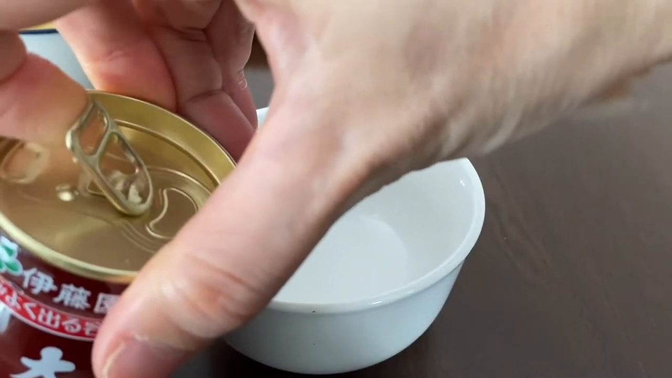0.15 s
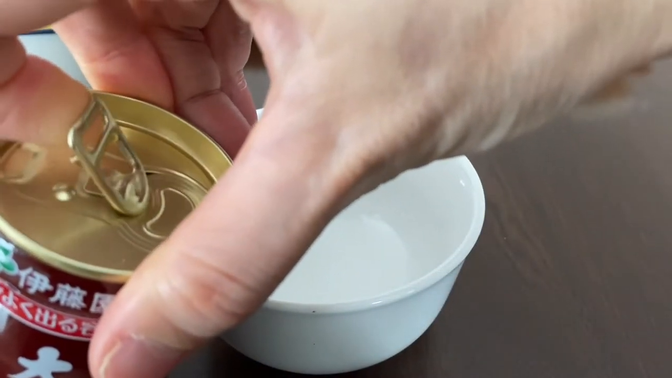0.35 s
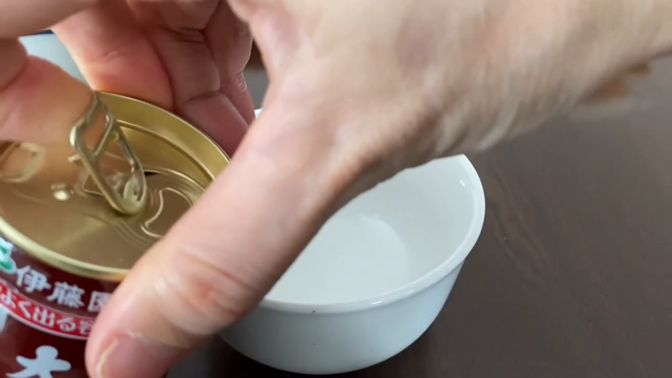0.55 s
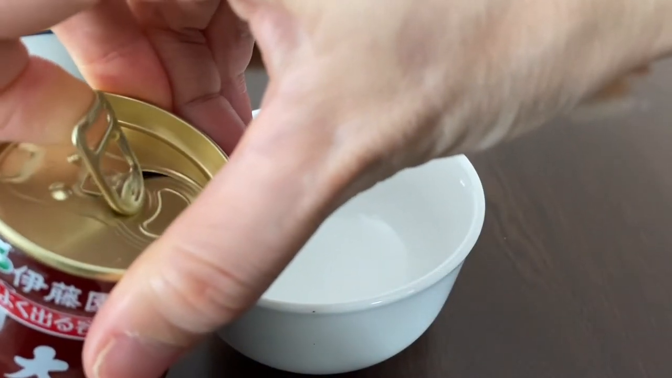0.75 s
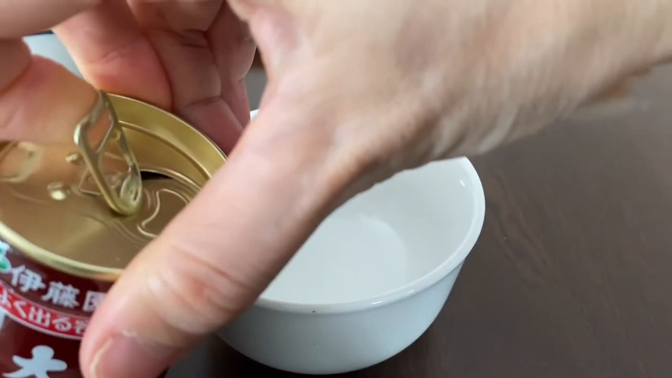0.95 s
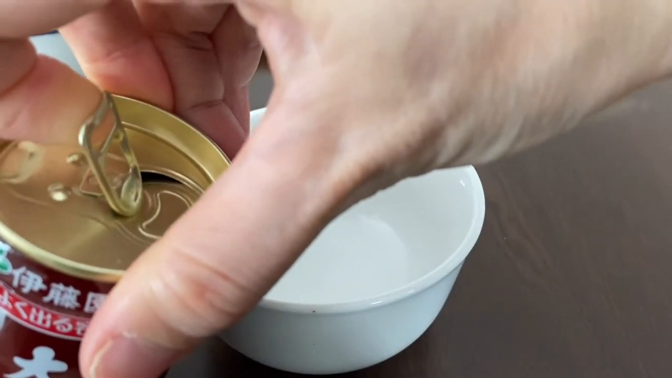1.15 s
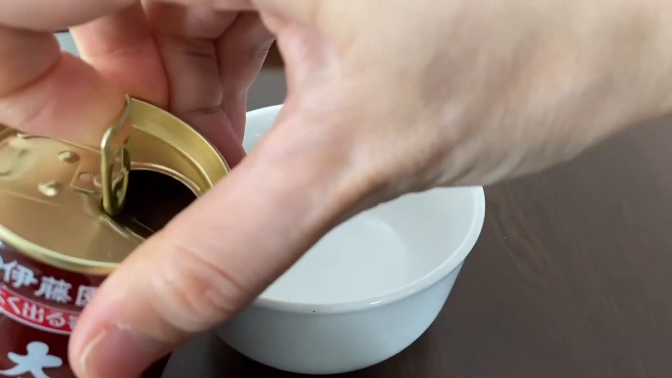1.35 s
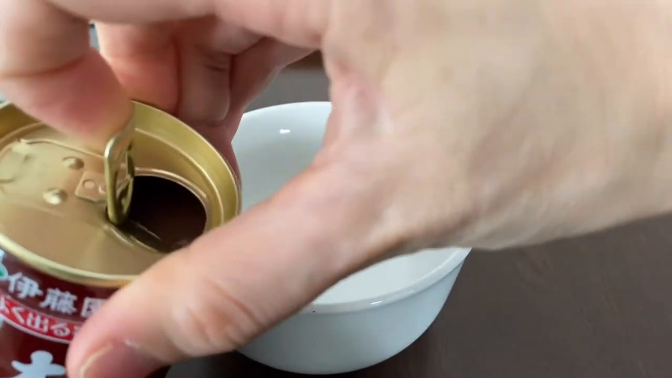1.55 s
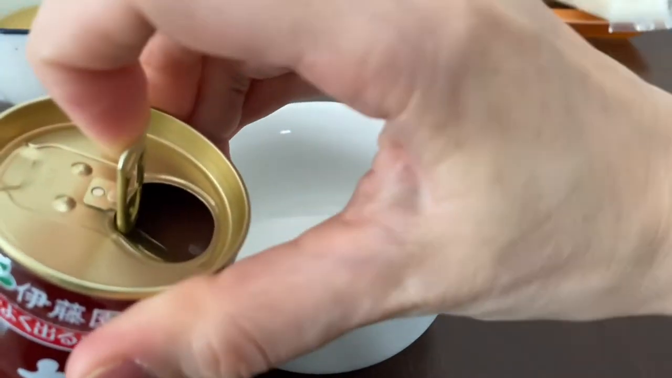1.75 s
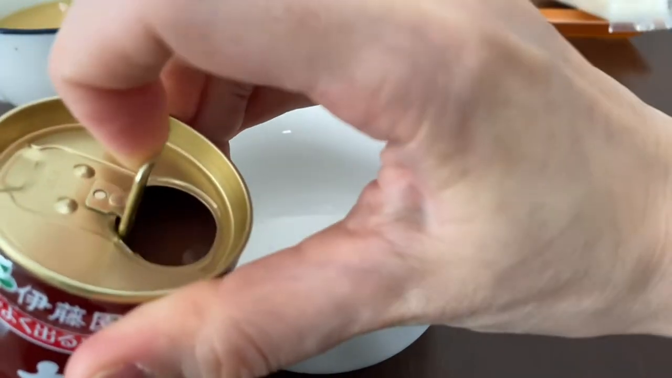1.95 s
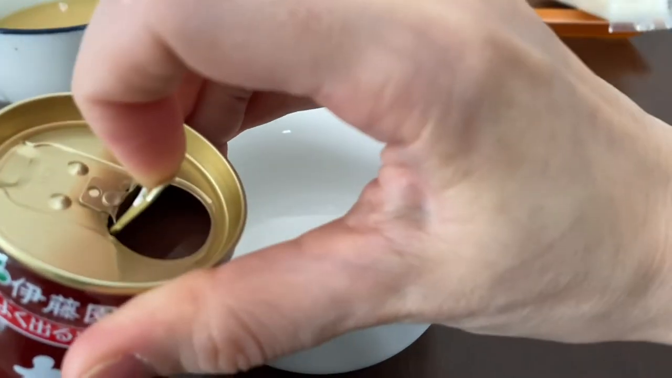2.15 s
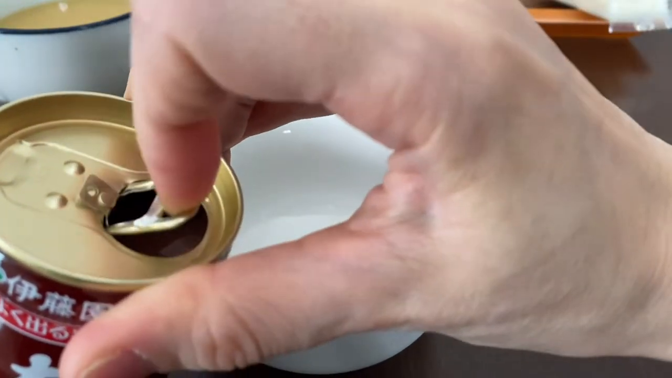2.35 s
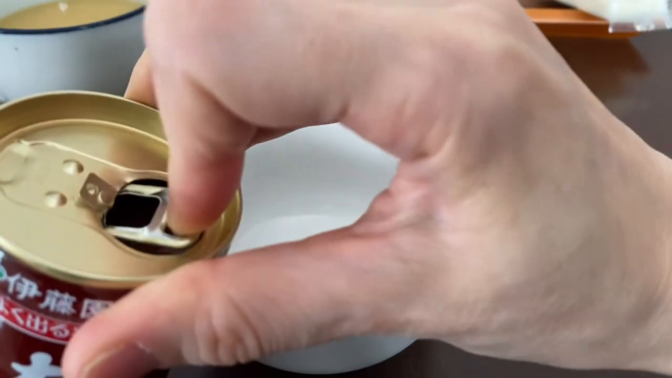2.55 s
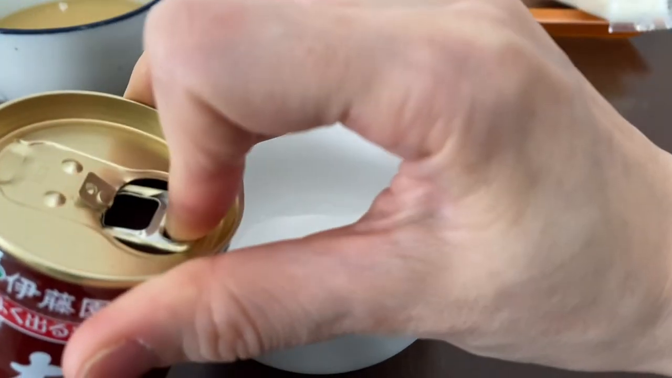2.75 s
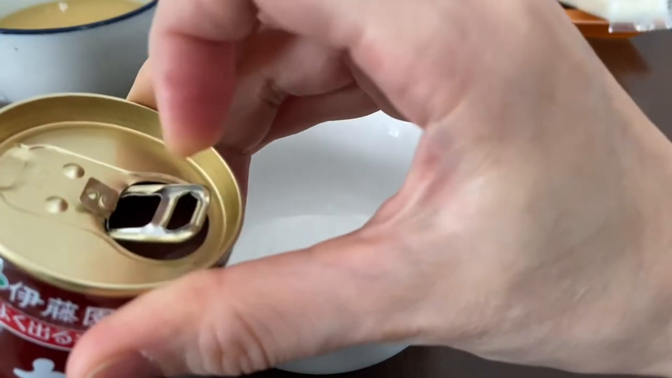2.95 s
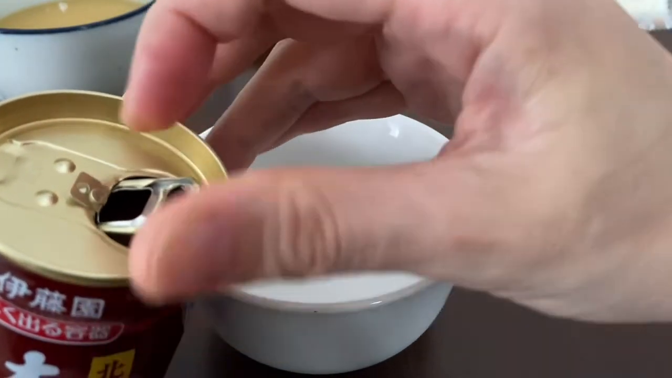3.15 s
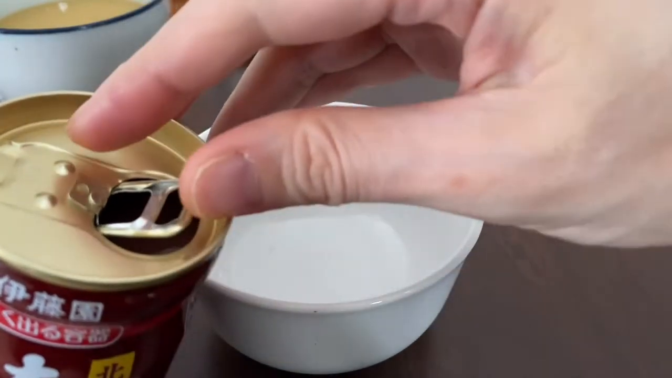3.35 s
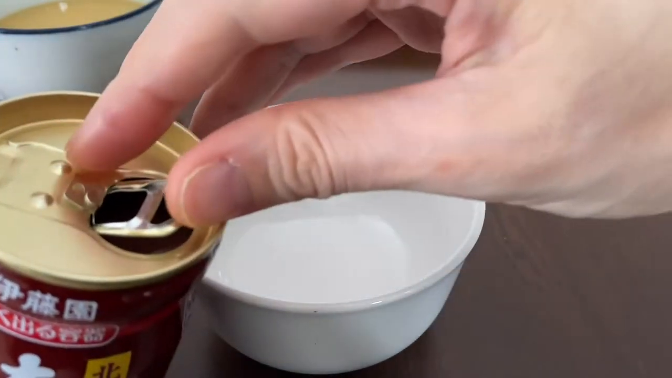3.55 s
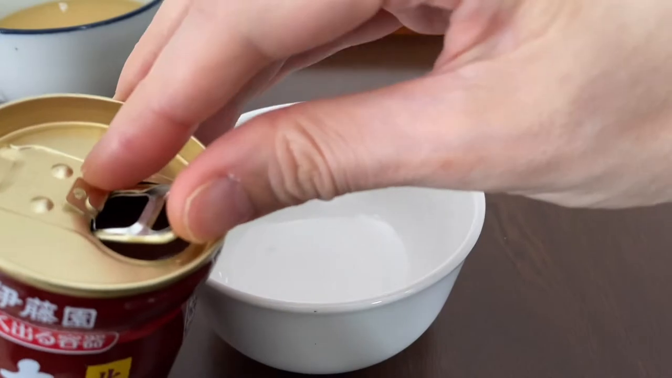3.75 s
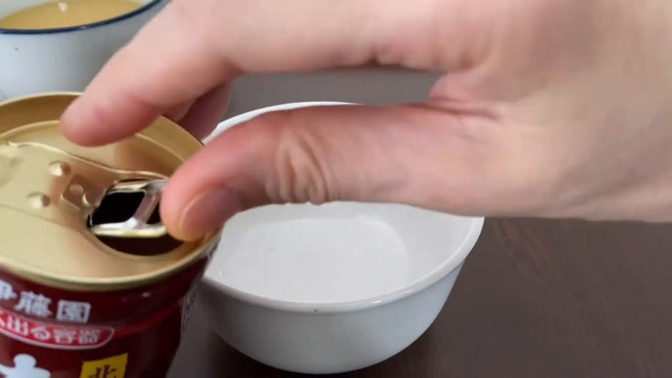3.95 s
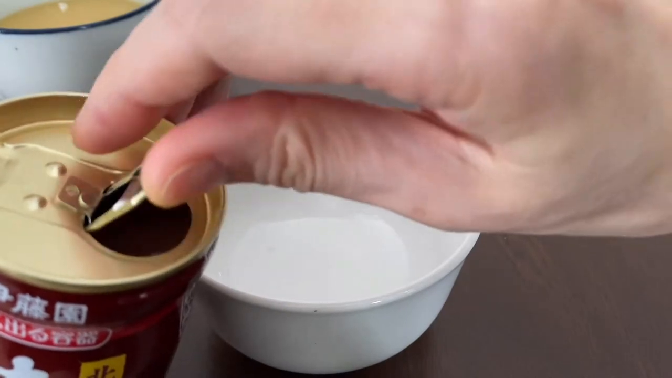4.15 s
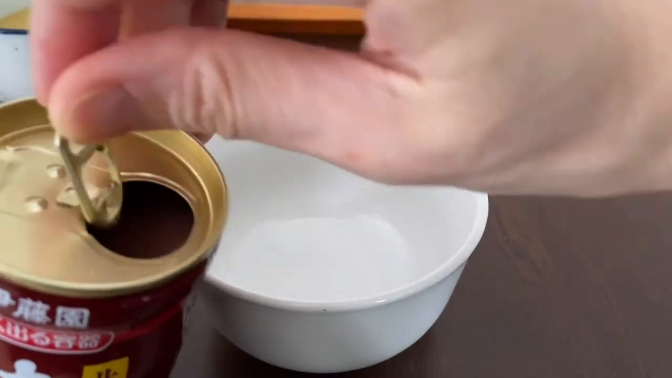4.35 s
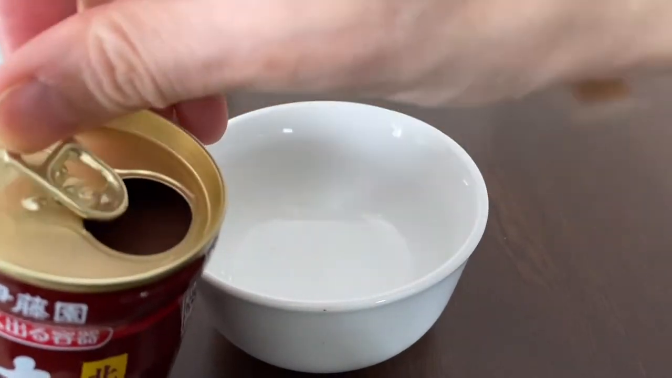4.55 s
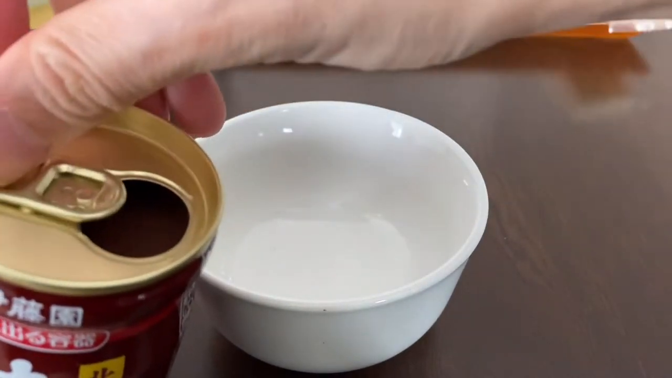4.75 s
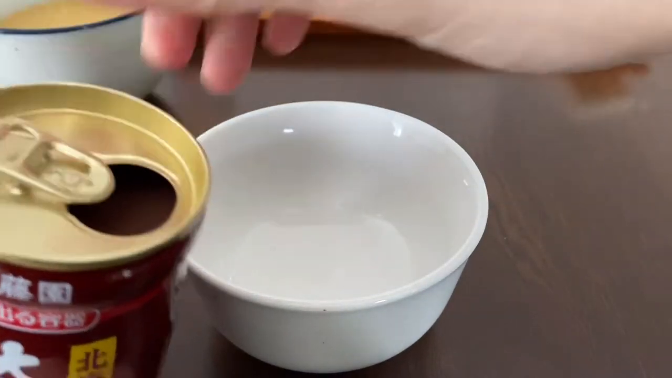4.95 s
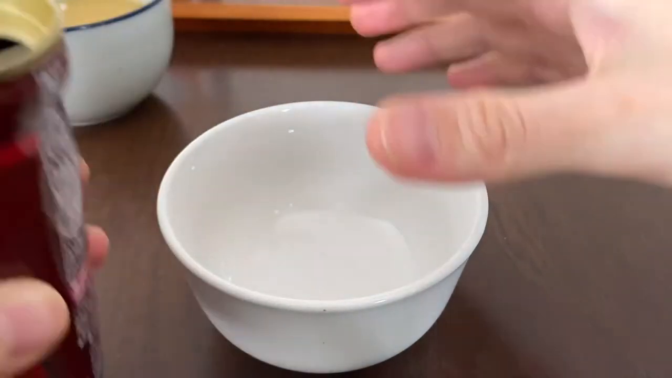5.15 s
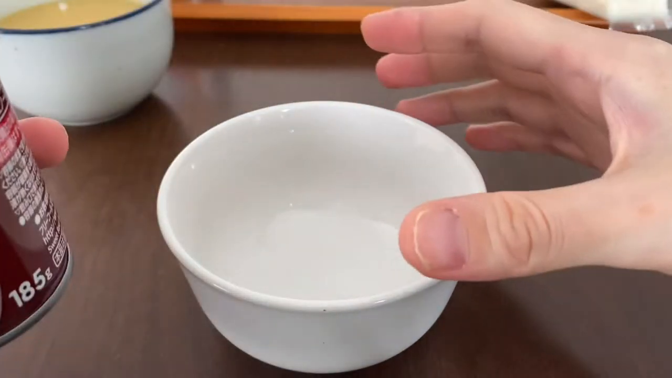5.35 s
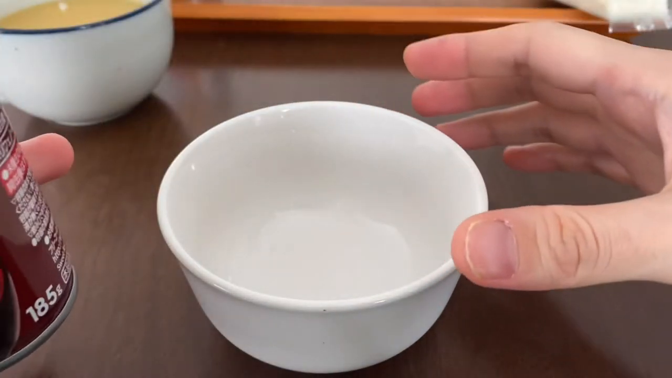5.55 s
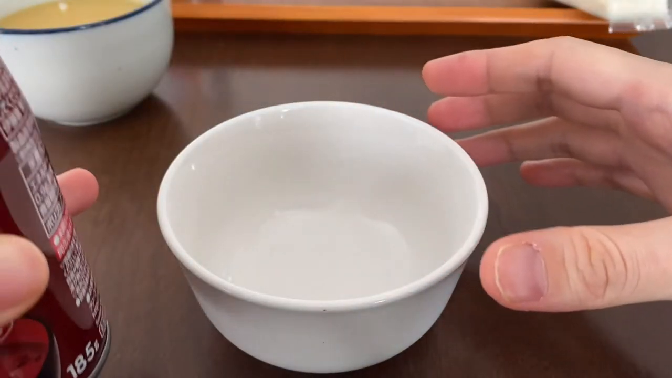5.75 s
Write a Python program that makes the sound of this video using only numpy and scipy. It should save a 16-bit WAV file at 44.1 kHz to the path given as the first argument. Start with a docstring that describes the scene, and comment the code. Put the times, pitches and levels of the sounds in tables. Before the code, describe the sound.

Close up, a steel drink can's lid tears open in sharp metallic snaps, pops hollowly, then the tab clicks and creaks in a quiet room.

```python
"""A small quiet room: a steel drink can is opened on a table, close to the microphone.
The tab tears the scored lid in sharp snaps (bursts of noise that ring the lid's modes) until the flap
gives way and the air space rings in wavering damped sines; then the tab is pressed flat, rubbed and
bent up again, and the can is slid aside: faint ticks, soft taps, stick-slip creaks and soft bands of
noise. An echo and a tail answer from the room, over a low rumble and a faint hiss."""
import sys
import numpy as np
from scipy import signal
from scipy.fft import rfft, irfft, next_fast_len
from scipy.io import wavfile
from scipy.ndimage import uniform_filter1d

SR = 44100
rng = np.random.default_rng(int(sys.argv[2]) if len(sys.argv) > 2 else 0)


def transcribe(signal):
    """Save signal, clipped to [-1, 1], as a 16-bit WAV file at the path in sys.argv[1]."""
    frames = np.atleast_2d(signal).T
    limited = np.clip(frames, -1, 1)
    pcm = np.round(limited * 32767).astype(np.int16)
    wavfile.write(sys.argv[1], SR, pcm)


N = 259308
T = np.arange(SR // 2) / SR  # seconds after a blow

# The score tears or the tab's hinge gives. Each row: start in seconds, relative level in dB, tearing time
# in ms, sharpness in dB, best excited ring in Hz, room send in dB relative to the blow.
SNAP_EVENTS = [ (.092, -14.5, 1.7, 8, 4500, -16), (0.2267, -31, 0.61, -2.5, 4200, -36.5),
               (.3451, -14, 0.91, 9, 7680, -22.5), (0.4825, -13, 1.9, 2.5, 4950, -19),
               (0.5109, -23, 1.22, 1, 5400, -19), (.6959, -17, 1.6, -4.5, 5200, -23.5),
               (.9238, -15, 1.6, -17, 4970, -24), (0.9352, -20, 3.5, 0.5, 5580, -20),
               (1.033, -22, 3.9, -13.5, 4350, -23.5), (1.0519, -18, 7.4, 5.5, 7280, -34),
               (1.0559, -9.5, 2.06, -10.5, 5200, -31.5), (1.0688, -15, 2.5, 11.5, 13100, -15.5),
               (1.8525, -15, 2.2, 7.5, 7220, -18), (2.1007, -38, 3.1, -1.5, 2000, -36.5),
               (2.448, -36.5, 1.65, -2, 5220, -11), (2.6823, -41, 1.55, 1, 5000, -16),
               (4.136, -12, 2, -1.5, 4100, -17), (4.487, -15, 0.92, 10.5, 3580, -26)]
# Faint ticks before, after and between the snaps. Each row: start in seconds, relative level in dB,
# sharpness in dB.
TICK_EVENTS = [(0.085, -33.5, -2.5), (0.099, -31.5, 7.5), (0.1161, -34.5, -1), (.2102, -49, -7),
               (0.621, -56, -12), (0.9496, -33.5, 1.5), (1.699, -62.5, -15.5), (1.827, -47.5, -2.5),
               (1.8358, -43.5, 2), (3.8, -62, 10.5), (4.061, -62.5, -12), (4.115, -43.5, 3),
               (4.4336, -66, 5.5), (4.605, -52.5, -34), (4.7436, -54, 21), (5.061, -60, 16),
               (5.0995, -57.5, -7.5)]
# Modes of the steel lid while the flap holds. Each row: pitch in Hz, level in dB, t60 in seconds.
HELD_LID_MODES = [(2300, -10, 0.0071), (2830, -5.5, 0.0062), (3310, -8.5, 0.012), (3790, -4, 0.03),
                  (4190, -1.5, 0.023), (4520, -4.5, 0.027), (4560, 2.5, 0.012), (4911, 1, 0.013),
                  (5640, 0.5, 0.01), (5900, -1.5, 0.016), (6207, -0.5, 0.01), (7093, -6, 0.02),
                  (8800, -9, 0.013), (10670, -6.5, 0.02), (14150, -5.5, .014)]
# Modes of the lid once the flap is free. Each row: pitch in Hz, level in dB, t60 in seconds.
OPEN_LID_MODES = [(2274, -5, 0.027), (3150, -7, 0.0064), (3174, -5, 0.016), (3714, -0.5, 0.0018),
                  (4000, 1.5, 0.027), (4126, -7, .014), (5060, -6, 0.022), (5250, -3, 0.0063),
                  (6600, -6.5, 0.0059), (6750, -5, 0.029), (7800, -7, 0.023), (11900, -9, .014),
                  (14200, 0, .016)]
# Once the flap is free, the lid's drum follows the strain of the tab and the finger that damps it.
# Each row: time in seconds, pitch in Hz, level in dB before the effect of sharpness.
FREE_DRUM_PATH = [(1.07, 1265, -20), (1.85, 1321, -4.5), (2.1, 1410, 1), (2.45, 1326, -17), (2.68, 1420, 8),
                  (4.14, 1390, -3), (4.49, 1460, 2.5), (5.1, 1496, 2.5)]
# Spectrum of a crack. Each row: frequency in Hz, relative level in dB per Hz.
CRACK_SPECTRUM = [(100, -31), (350, -24), (600, -13.5), (950, -12.5), (1350, 1.5), (2400, 0), (3200, 0),
                  (6000, 3.5), (8500, -3), (11000, -3.5), (13800, -2), (16000, -14)]
# Modes of the flap as it springs loose. Each row: pitch in Hz, level in dB, t60 in seconds.
FLAP_MODES = [(1246, -6, 0.024), (1890, 0, .01), (2800, 6.5, 0.013), (3849, -10, 0.022), (5200, -6, 0.027)]
# Modes of the air above the drink. Each row: mean pitch in Hz, mean level in dB, t60 in seconds.
HEADSPACE_MODES = [(1178, -3.5, 0.56), (1218, -1, 0.35), (1194, 1.5, .2), (2560, -8, .5), (2690, -8, 0.35),
                   (2730, -9, 0.34), (2900, -12, .45), (5392, -13, 0.45)]
# Low modes of the can standing on the table. Each row: pitch in Hz, level in dB, t60 in seconds.
BODY_MODES = [(314.1, -10, .12), (412, -1.5, 0.14), (505.5, -1.5, 0.053), (657, 5.5, .06), (788, -4, 0.16)]
# The tab or a fingertip lands on the lid. Each row: start in seconds, tab ring in dB, tab bending pitch
# in Hz, bending level in dB, lasting ring in dB, knock level in dB, knock pitch in Hz, click level in dB.
TAP_EVENTS = [(2.7172, -34.5, 2295, -39, -67, -37.5, 456.5, -43),
              (2.9166, -62.5, 1513, -49, -81, -43, 693, -64),
              (4.6993, -42, 2104, -38.5, -52, -56, 724, -34.5)]
# Higher modes of the tab and its rivet. Each row: pitch in Hz, level in dB, t60 in seconds.
TAB_MODES = [(1605, 8, 0.059), (2930, 9.5, 0.06), (3136, 13.5, 0.038), (3816, 9.5, 0.028),
             (3970, 17, 0.018), (4860, -2, 0.055), (5770, -19, 0.049), (5910, -13, 0.038)]
# Jolts of the opened can. Each row: start in seconds, bump on the table in dB, headspace modes in dB.
JOLT_EVENTS = [(1.853, -41.5, -57.5), (2.101, -55, -66), (2.449, -49, -80), (2.918, -43.5, -70),
               (4.137, -43, -48), (4.487, -43, -54)]
# The tab creaks on its rivet or under a fingernail. Each row: start in seconds, length in seconds,
# level in dB, growth over its length in dB.
CREAK_EVENTS = [(1.844, 0.0084, -37.5, 15), (2.073, 0.029, -49, 10), (2.673, 0.031, -48.5, 5),
                (3.294, 0.038, -41.5, 10), (3.341, .125, -56, -11.5), (4.124, .017, -39.5, 21),
                (4.674, .023, -58.5, 0)]
# Resonances of a creak. Each row: pitch in Hz, level in dB, t60 in seconds.
CREAK_MODES = [(1310, 4, 0.01614), (1709, 2, 0.03), (2130, -4, 0.025), (2910, -2, 0.032),
               (4170, -1.5, 0.014), (5100, -3, 0.013), (5685, -0.5, .008), (8500, 4.5, 0.021),
               (14000, -4, 0.0074)]
# Soft bands of noise that swell and fade. Each row: peak in seconds, fade time constant in seconds,
# level in dB, centre in Hz, width in Hz of each of two filter passes.
SWELL_EVENTS = [(.02, 0.042, -59, 480, 308), (2.451, 0.15, -55, 4920, 7870), (2.441, 0.12, -56, 1600, 2646),
                (2.673, .03, -53, 1367, 401), (2.89, 0.043, -68.5, 12130, 8000),
                (3.745, 0.014, -60, 7900, 11440), (4.165, .043, -51.5, 451, 331),
                (4.785, .065, -57.5, 582, 416)]
# Spectrum of the room's tail. Each row: frequency in Hz, relative level in dB per Hz.
ROOM_SPECTRUM = [(100, -7.5), (400, 9), (900, 7.5), (1500, 0), (3000, 1), (5500, -3.5), (9000, -5),
                 (16000, -5.5)]
# Spectrum of the room's background. Each row: frequency in Hz, relative level in dB per Hz.
FLOOR_SPECTRUM = [(15, -33.5), (25, -7.5), (92, -3.5), (120, -10.5), (195, -1), (223, -7), (263, -5.5),
                  (354, -11.5), (516, -17), (840, -20.5), (911, -24.5), (1370, -23), (1520, -25.5),
                  (1700, -27), (16000, -38.5)]

# all ticks are alike in length, best excited ring and room send
TICK_MS, TICK_RING_HZ, TICK_ROOM_DB = 3.7, 3986, -20.5
SNAP_RING_DB, TICK_RING_DB = -2, -12.5  # a tick rings the sheet less than a fracture
# sharpness lifts the treble of the crack; a blunter blow moves the sheet and the whole lid instead
RING_DB_PER_SHARP_DB, DRUM_DB_PER_SHARP_DB = -0.52, -.5
OPENED_S = 1.06  # from here on the lid rings with a free flap
# the lid's drum pitch climbs steadily while the score tears
DRUM_START_HZ, DRUM_RISE_HZ_PER_S, HELD_DRUM_DB = 556.8, 261, -19
ROOM_BURST_MS = 5  # the room gets a longer, denser burst, so its tail is smooth
HOLE_DB = -2  # breathing mode of the opening, relative to the bump
CREAK_RASP_DB = -7.5  # the slips themselves are heard as a broad rasp
CREAK_TREBLE_DB = -12  # all creaks are equally dull
CREAK_BODY_DB = -17  # a creak also shakes the body of the can
SWELL_RISE_SHARE = .38  # a band of noise rises faster than it fades
HANDLING_ROOM_DB = -19  # how much of the flap and the handling reaches the room
ECHO_S = .0108  # delay of the near surface
FLOOR_DB = -62.5
TOP_HZ = 16300  # upper limit of the microphone


def undb(db):
    """Decibels to gain."""
    return 10 ** (np.asarray(db) / 20)


def unit(x):
    """Scale to an rms of 1."""
    return x / np.sqrt(np.mean(x ** 2))


def blow(x, db):
    """Scale a short sound to the energy of 5 ms at this level."""
    return x * undb(db) * np.sqrt(.005 * SR / np.sum(x ** 2))


def add(out, s, x):
    """Mix x in from time s."""
    i = int(s * SR)
    out[i:i + len(x)] += x[:len(out) - i]


def colour(x, points, treble_db=0):
    """Causal minimum-phase filter with a given spectrum and a treble shelf around 7 kHz."""
    size = next_fast_len(len(x) + 4096)
    size += size % 2
    f = np.arange(size // 2 + 1) * SR / size + 1  # 1 Hz up, to keep the logarithm finite
    hz, db = np.transpose(points)
    gain_db = np.interp(np.log(f), np.log(hz), db) + treble_db / (1 + (7000 / f) ** 4)
    # folding the cepstrum forward makes the filter causal
    cepstrum = irfft(np.log(undb(gain_db)))
    cepstrum[1:size // 2] *= 2
    cepstrum[size // 2 + 1:] = 0
    response = np.exp(rfft(cepstrum))
    return irfft(rfft(x, size) * response)[:len(x)]


def ring(modes, scatter=0):
    """Damped sines of alternating sign; changing strain detunes them a little."""
    detune = 1 + scatter * rng.standard_normal(len(modes))
    out = np.zeros(len(T))
    for k, (hz, db, t60) in enumerate(modes):
        decay = undb(db - 60 * T / t60)
        out += (-1) ** k * decay * np.sin(2 * np.pi * hz * detune[k] * T)
    return out


def snaps():
    """Fractures and faint ticks ring the same lid; returns the direct sound and what the room gets."""
    direct, to_room = np.zeros(N), np.zeros(N)
    blows = [(*row, SNAP_RING_DB) for row in SNAP_EVENTS]
    for s, db, sharp_db in TICK_EVENTS:
        blows.append((s, db, TICK_MS, sharp_db, TICK_RING_HZ, TICK_ROOM_DB, TICK_RING_DB))
    for s, db, ms, sharp_db, best_hz, room_db, ring_db in blows:
        near, far = lid_blow(s, ms, sharp_db, best_hz, ring_db)
        add(direct, s, near * undb(db))
        add(to_room, s, far * undb(db + room_db))
    return direct, to_room


def lid_blow(s, ms, sharp_db, best_hz, ring_db):
    """One blow cracks, rings the sheet and drums the lid; returns the direct sound and what the room gets."""
    if s < OPENED_S:
        lid, drum_db = HELD_LID_MODES, HELD_DRUM_DB
        drum_hz = DRUM_START_HZ + DRUM_RISE_HZ_PER_S * s
    else:
        times, pitches, levels = np.transpose(FREE_DRUM_PATH)
        lid, drum_db = OPEN_LID_MODES, np.interp(s, times, levels)
        drum_hz = np.interp(s, times, pitches)
    # the place of the blow decides which modes are driven best: 7 dB less per octave away
    placed = [(hz, mode_db - 7 * abs(np.log2(hz / best_hz)), t60) for hz, mode_db, t60 in lid]
    modes = ring(placed, scatter=.012)
    # the lid swings up as a whole
    swing = ring([(drum_hz, 0, .017)]) * (1 - np.exp(-T / 0.0019))
    drum = blow(swing, drum_db + DRUM_DB_PER_SHARP_DB * sharp_db)

    def driven(force, lid_db):
        """The crack of this force and the ring of the lid under it."""
        sheet = signal.fftconvolve(force, modes)[:len(T)]
        sheet = blow(sheet, ring_db + RING_DB_PER_SHARP_DB * sharp_db)
        crack = blow(colour(force, CRACK_SPECTRUM, sharp_db), 0.36)
        return crack + undb(lid_db) * (sheet + drum)

    near = blow(driven(tear(ms), 0), 1.13)
    # the room gets less ring and more crack, for a smoother tail
    far = blow(driven(tear(ROOM_BURST_MS), -3.5), 2.7)
    return near, far


def tear(ms):
    """Force of a fracture: a dense run of tiny slips that dies within milliseconds."""
    age = T * 1000 / ms
    fade = np.exp(-age ** 1.3) + 0.096 * np.exp(-age / 3)
    return rng.standard_normal(len(T)) * fade


def flap_pop(s=1.0708, flap_db=-14, headspace_db=-28, hole_db=-42, body_db=-46):
    """The last of the score parts: the flap springs into the can and sets its air ringing."""
    out = np.zeros(N)
    flap = ring(FLAP_MODES) * (1 - np.exp(-T / 0.00053))
    add(out, s, blow(flap, flap_db))
    add(out, s, headspace(headspace_db) + hole_tone(hole_db) + blow(ring(BODY_MODES), body_db))
    return out


def headspace(db, wobble=0.049):
    """The drink trembles after a jolt, so each mode of the air above it wavers in pitch and strength."""
    out = np.zeros(len(T))
    for hz, mode_db, t60 in HEADSPACE_MODES:
        tremble = unit(uniform_filter1d(rng.standard_normal(len(T)), size=300))
        flutter = unit(uniform_filter1d(rng.standard_normal(len(T)), size=300))
        phase = 2 * np.pi * np.cumsum(hz * (1 + wobble * tremble)) / SR
        out += undb(mode_db + 2 * flutter - 60 * T / t60) * np.sin(phase)
    fade = np.cos(np.pi / 2 * (T / T[-1]) ** 2)
    return blow(out * fade, db)


def hole_tone(db):
    """Air pumps in and out of the opening, like a bottle tone."""
    tone = ring([(174.5, 0, 0.092)], scatter=0.027)
    return blow(tone * (1 - np.exp(-T / 0.01)), db)


def can_air():
    """Later jolts stir the air in the opened can, and its body bumps the table, building up over a few cycles."""
    out = np.zeros(N)
    for s, bump_db, modes_db in JOLT_EVENTS:
        body = ring(BODY_MODES, scatter=0.037) * (1 - np.exp(-T / 0.01))
        add(out, s, headspace(modes_db) + hole_tone(bump_db + HOLE_DB) + blow(body, bump_db))
    return out


def taps():
    """A soft landing: the tab bends and rings, on and on if no finger damps it, and the can knocks on the table."""
    out = np.zeros(N)
    for s, tab_db, bend_hz, bend_db, lasting_db, knock_db, knock_hz, click_db in TAP_EVENTS:
        tab = blow(ring(TAB_MODES), tab_db)
        bend = blow(ring([(bend_hz, 0, .05)]), bend_db)
        lasting = blow(ring([(bend_hz, 0, .45)]), lasting_db)
        knock_modes = [(knock_hz, 0, .07), (0.883 * knock_hz, -5, .09), (1.56 * knock_hz, -11, .04)]
        knock = blow(ring(knock_modes), knock_db)
        click = blow(colour(tear(4.8), CRACK_SPECTRUM, treble_db=-5), click_db)
        add(out, s, tab + bend + lasting + knock + click)
    return out


def creaks():
    """Stick-slip: runs of uneven little slips ring the tab and lid."""
    out = np.zeros(N)
    for s, length, db, growth_db in CREAK_EVENTS:
        slips = rng.standard_normal(len(T)) * undb(3.0 * rng.exponential(size=len(T)))
        grip = np.clip(np.minimum(T, length - T) / 0.0023, 0, 1)  # the contact takes hold and lets go
        force = slips * grip * undb(growth_db * np.minimum(T / length, 1))
        metal = signal.fftconvolve(force, ring(CREAK_MODES, scatter=0.029))[:len(T)]
        rasp = colour(force, CRACK_SPECTRUM)
        creak = unit(metal) + undb(CREAK_RASP_DB) * unit(rasp)
        creak = colour(creak, [(200, 0), (1000, 0)], CREAK_TREBLE_DB)  # flat below the treble shelf
        body = signal.fftconvolve(force, ring(BODY_MODES))[:len(T)]
        creak = unit(creak) + undb(CREAK_BODY_DB) * unit(body)
        # the level counts over the length of the creak, not over all of T
        add(out, s, unit(creak) * undb(db) * np.sqrt(length / T[-1]))
    return out


def noise_swells():
    """Soft bands of twice-filtered noise that swell and fade, with a fine grain."""
    out, t = np.zeros(N), np.arange(N) / SR
    for s, fade, db, hz, width_hz in SWELL_EVENTS:
        b, a = signal.iirpeak(hz, hz / width_hz, fs=SR)
        band = signal.lfilter(b, a, rng.standard_normal(N))
        band = signal.lfilter(b, a, band)
        grain = undb(1.5 * unit(uniform_filter1d(rng.standard_normal(N), size=200)))
        rise = ((s - t) / (SWELL_RISE_SHARE * fade)) ** 2
        swell = np.exp(-np.where(t < s, rise, (t - s) / fade))
        out += unit(band * grain) * swell * undb(db)
    return out


def room(x, early_t60=0.16, late_t60=.8, late_db=-13, echo_db=-8):
    """A near surface answers first; then a quick and a slow tail, the treble dying sooner."""
    t = np.arange(SR) / SR
    low_pass = signal.butter(2, 7500, fs=SR, output="sos")
    high_pass = signal.butter(2, 7500, "high", fs=SR, output="sos")
    low = signal.sosfilt(low_pass, rng.standard_normal(SR))
    high = signal.sosfilt(high_pass, rng.standard_normal(SR))
    decay = undb(-60 * t / early_t60) + undb(late_db - 60 * t / late_t60)
    tail = (low + high * undb(-35 * t)) * decay  # the treble loses 35 dB more per second
    tail = colour(tail * (1 - np.exp(-t / 0.0017)), ROOM_SPECTRUM)
    tail = unit(tail) / np.sqrt(SR)  # total energy of 1
    tail[int(ECHO_S * SR)] += undb(echo_db)
    return signal.fftconvolve(x, tail)[:N]


def background():
    """Low steady rumble of the room and a faint hiss, both from one coloured noise."""
    return unit(colour(rng.standard_normal(N), FLOOR_SPECTRUM)) * undb(FLOOR_DB)


def scene():
    """Snaps and handling close to the microphone, their room, and the background."""
    direct, to_room = snaps()
    can = flap_pop() + taps() + can_air() + creaks() + noise_swells()
    reverberation = room(to_room + undb(HANDLING_ROOM_DB) * can)
    return (direct + can + reverberation + background())[None]


def record(dry):
    """The microphone drops the deepest bass, rounds the highest peaks and cuts the top."""
    x = signal.sosfilt(signal.butter(8, 41, "high", fs=SR, output="sos"), dry)
    x = x / (1 + (x / .85) ** 4) ** .25
    return signal.sosfilt(signal.ellip(8, .2, 70, TOP_HZ, fs=SR, output="sos"), x)


dry = scene()
out = record(dry)
transcribe(out)
```